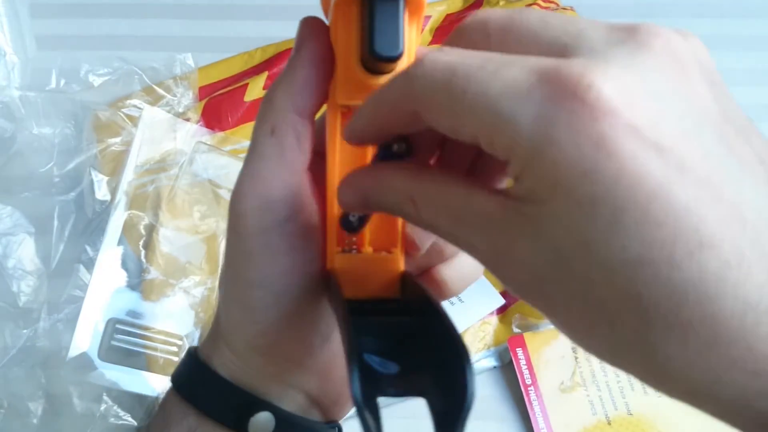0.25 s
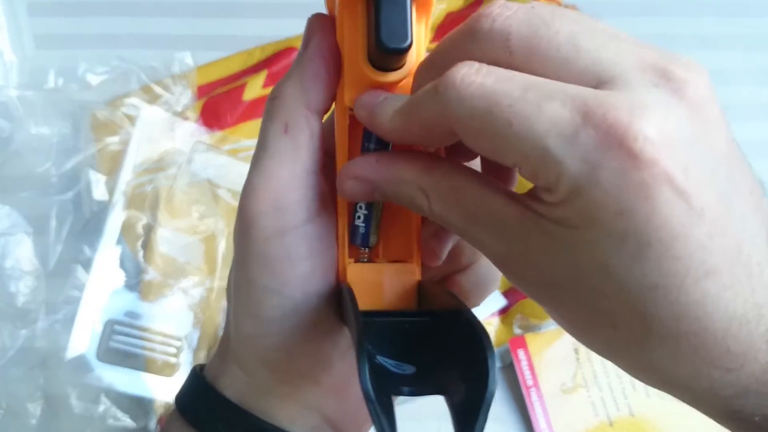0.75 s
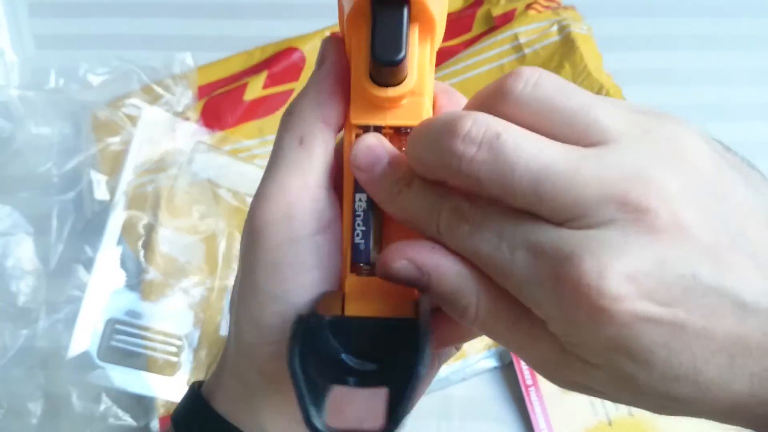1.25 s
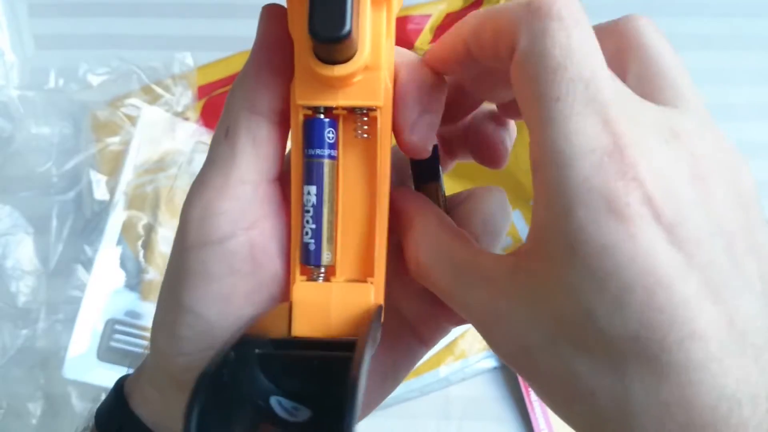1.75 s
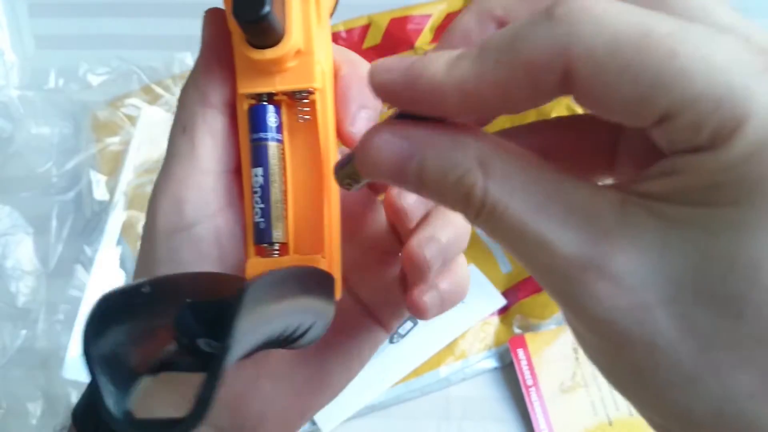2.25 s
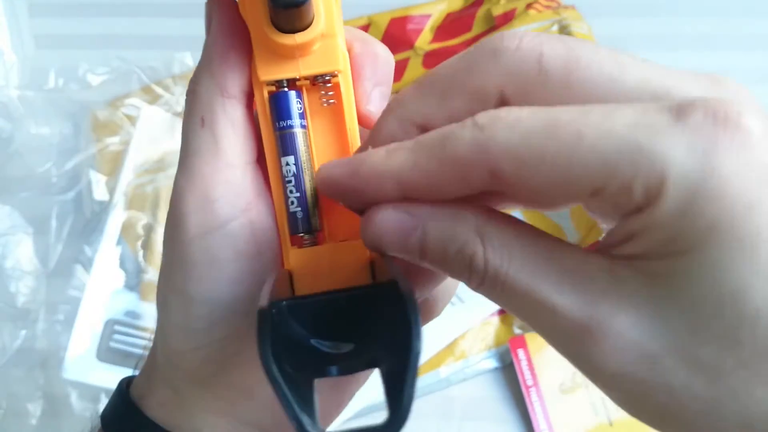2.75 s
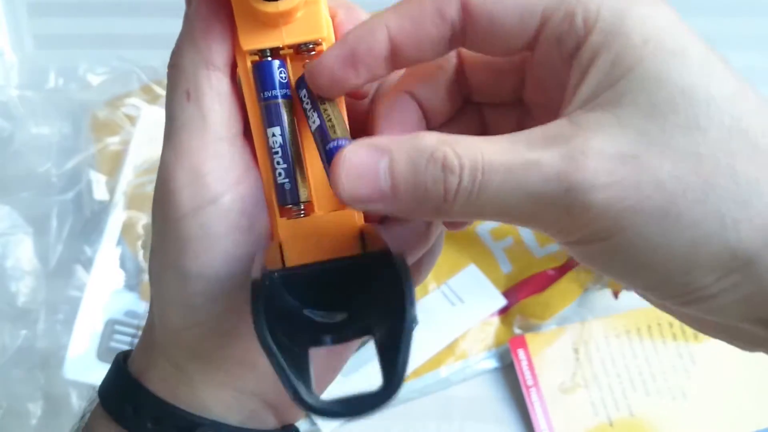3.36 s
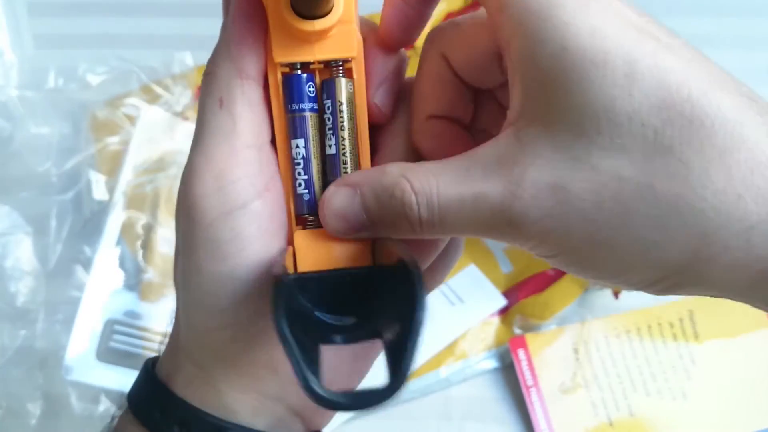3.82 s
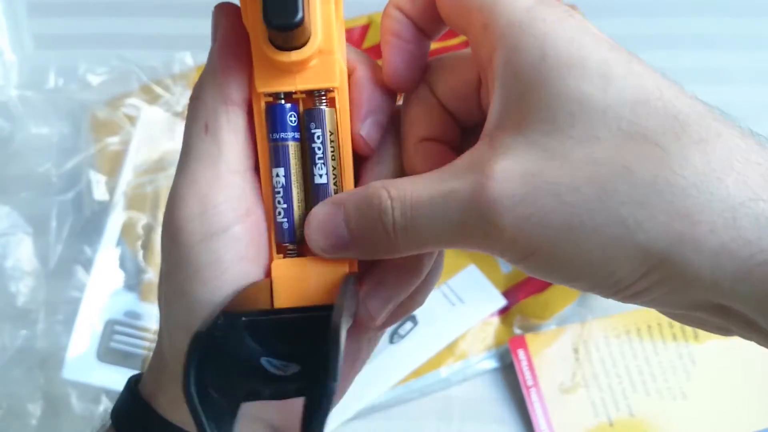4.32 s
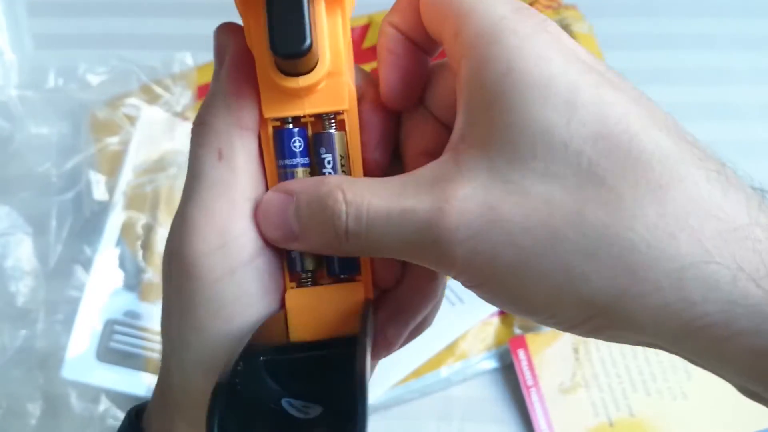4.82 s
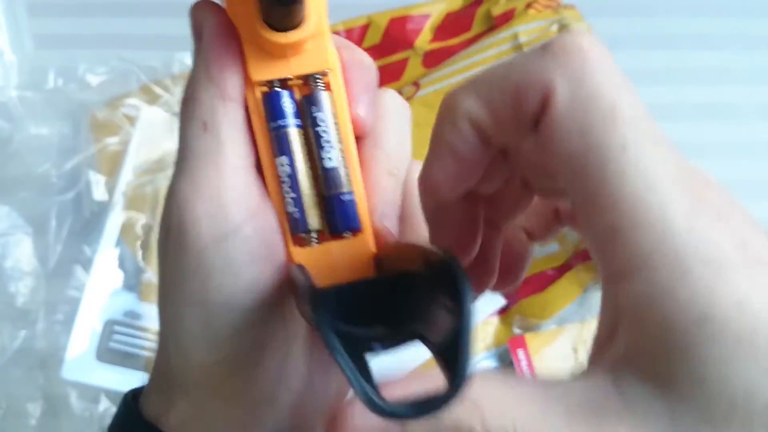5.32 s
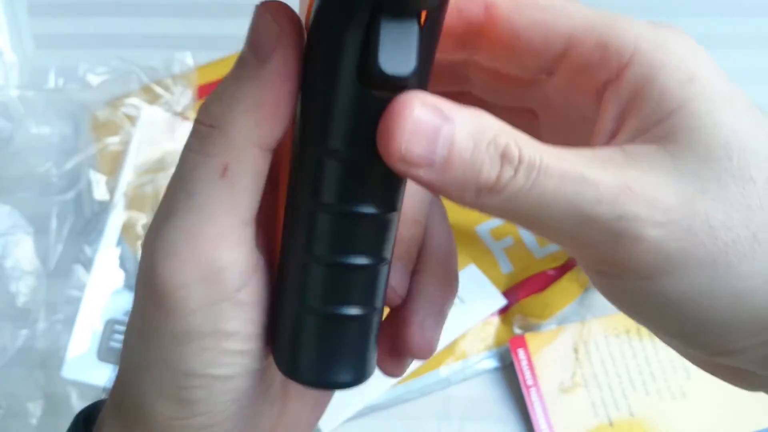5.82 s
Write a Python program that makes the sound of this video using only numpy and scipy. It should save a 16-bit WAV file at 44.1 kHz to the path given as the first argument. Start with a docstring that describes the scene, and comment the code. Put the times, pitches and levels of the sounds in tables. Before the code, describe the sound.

Small batteries click, scrape and snap into a handheld tool's plastic compartment, then the cover locks with a loud crack.

```python
"""A plastic battery cover locks with a hard crack that overloads the microphones, ending the scene.
Before it, two small batteries tick, scrape and snap against their springs in the grip of a handheld tool,
fingers rub the plastic and the cover swings shut. Impacts and stick-slip friction excite the resonant
modes of the case; springs and cover ring on after each blow. A small, live room adds reflections and
reverberation, and a thin top-treble hiss lingers after each blow, over a faint rumble, hum and hiss."""
import sys
import numpy as np
from scipy import signal
from scipy.fft import rfft, irfft, next_fast_len
from scipy.io import wavfile
from scipy.ndimage import map_coordinates

SR = 44100
rng = np.random.default_rng(int(sys.argv[2]) if len(sys.argv) > 2 else 0)


def wav_out(sig):
    """Save sig, one row per channel (or a flat mono array), as 16-bit PCM at SR to the path in sys.argv[1]."""
    wavfile.write(sys.argv[1], SR, np.round(np.clip(np.atleast_2d(sig).T, -1, 1) * 32767).astype(np.int16))


N = 268128
LATCH_S = 5.9997  # the cover locks


# Rebounds of the cover: (time after locking [s], level re the first blow [dB])
COVER_REBOUNDS = [(.0034, -7), (.0062, -17.5), (.0098, -25), (0.0147, -24.5), (0.019, -15.5)]

def latch(db, knock_db, ring_db, edge_db, wall_hz, wall_db, contact_ms, pan_db):
    """Impact and rebound: the cover locks with the hardest blow, then settles in weaker ones."""
    return [(LATCH_S + delay, db + softer_db, knock_db, ring_db, edge_db,
             wall_hz, wall_db, contact_ms, pan_db)
            for delay, softer_db in [(0, 0), *COVER_REBOUNDS]]


def catch():
    """Damped resonance: the small, stiff catch rings briefly in the top treble as it locks."""
    track, t = np.zeros((2, N)), np.arange(SR // 8) / SR
    zing = unit(filtered(stereo_noise(len(t), alike=0.2), lambda f: resonance(f, hz=15010, width=980) ** 2))
    add(track, LATCH_S, zing * decay(t, db=-17.5, t60=0.11))
    return track


# Spectrum of the jolted grip: (frequency [Hz], relative level [dB])
GRIP_SPECTRUM = [(20, -25), (40, -9), (60, 4), (100, -4), (170, -16), (260, -19), (450, -19), (1200, -46)]

def thud():
    """Recoil: the latch jolts the whole grip in the hand, giving a low, damped thud."""
    track, t = np.zeros((2, N)), np.arange(SR // 4) / SR
    body = shaped_noise(len(t), GRIP_SPECTRUM, alike=0.58)
    add(track, LATCH_S, body * decay(t, db=-42, t60=0.155) * amp([[-9], [3]]))
    return track


# A battery seats or the cover shuts: (time [s], relative level [dB], knock [dB], ring [dB], edge [dB],
# wall frequency [Hz], wall strength [dB], contact time [ms])
SEATING_BLOWS = [(3.5793, -14, -15.5, 2.9, -13, 3830, 3.4, 2.4),
                 (3.9349, -21, -14.5, 5.1, -6.5, 2310, 10, 1.1),
                 (5.3968, -18.5, -14, 4, -7.5, 3920, 0.76, 3.4)]
# Slip, strike and rebound: (time from the strike [s], relative level [dB])
SNAP_PHASES = [(-.0026, -17), (0, 0.5), (.0006, -6)]

def snaps(pan_db=0.3):
    """Snap-through: a part slips over its lip, strikes its seat and rebounds."""
    return [(s + delay, db + phase_db, knock_db, ring_db, edge_db, wall_hz, wall_db, contact_ms, pan_db)
            for s, db, knock_db, ring_db, edge_db, wall_hz, wall_db, contact_ms in SEATING_BLOWS
            for delay, phase_db in SNAP_PHASES]


# A battery or the cover taps the case: (time [s], relative level [dB], hardness [dB],
# wall frequency [Hz], wall strength [dB], contact time [ms], left minus right [dB])
LIGHT_BLOWS = [(0.002, -37, -16, 3150, 14, 5, 0.5), (0.1942, -45, 2.5, 3230, 1, 2, -4),
               (0.2285, -35.5, -8.5, 3150, 7, 2.83, -1.5), (0.58, -43.5, -10.5, 4570, 0, 2.03, -1),
               (0.8721, -32.5, -4.5, 3200, 5, 0.6, 2), (0.9177, -36.5, -3.5, 2360, 0, 1.6, 1),
               (0.9325, -27.5, -6.5, 3040, 9.5, 1.74, -7), (1.2326, -36, -2, 2240, 1, 2.96, 4),
               (1.411, -58.5, -2, 3200, 4, 3.7, -0.5), (2.397, -37, -6.5, 3760, 13, 0.56, -1.5),
               (2.4127, -33.5, -2, 3700, 4.5, 3.04, 4), (2.8124, -43, -5.5, 3180, 4, 4.1, 2),
               (2.9778, -53, -7, 3600, 3, 3.9, 1), (3.2116, -30, -4.5, 3260, 17.5, 1.2, 3),
               (3.2162, -29.5, -2, 3260, 18.5, 1.96, 4), (3.4596, -29.5, -9.5, 3280, 2.5, 3.9, 1.5),
               (3.5014, -34.5, -6, 2570, 0, 2.3, -4), (4.4084, -41, -1.5, 4160, 16, 1.35, -0.5),
               (4.6894, -48, 1.5, 3910, 6, 4.24, 0.5), (5.2816, -62, 10, 4310, 6, 1.8, 2),
               (5.2942, -51, 4, 2505, 7, 1.67, -1), (5.3133, -38.5, -0.5, 3510, 2, 7, 0),
               (5.3615, -35, -1, 2700, 10, 4.3, 1), (5.383, -34, -19, 2490, 11, 3.4, 3),
               (5.736, -48, -11, 1790, 15, 2.4, -3.5)]

def taps(knock_db=-12, edge_db=-13, edge_per_hardness=0.93):
    """Contact stiffness: the harder a light blow, the more energy reaches the upper registers."""
    return [(s, db, knock_db, hardness_db, edge_db + edge_per_hardness * hardness_db,
             wall_hz, wall_db, contact_ms, pan_db)
            for s, db, hardness_db, wall_hz, wall_db, contact_ms, pan_db in LIGHT_BLOWS]


# Free modes of the steel springs and the cover: (frequency [Hz], relative level [dB], 60 dB decay time [s])
RINGING_MODES = [(1340, -14.5, 0.021), (5170, -19, 0.055), (6820, -12.5, .07), (6970, -17.5, 0.087),
                 (7100, -25.5, .08), (14900, -24.5, 0.062)]
# Limits of the knock, middle, ring and edge registers: (frequency [Hz])
REGISTER_LIMITS = [780, 1900, 4600, 8000, 17500]

def impact(knock_db, ring_db, edge_db, wall_hz, wall_db, contact_ms, pan_db):
    """Impulse excitation: a blow and its chatter ring the case; register levels are re the middle one."""
    t = np.arange(SR // 12) / SR
    progress = t / (contact_ms / 1000)
    contact = (1 - np.exp(-progress / 0.14)) * np.exp(-progress / 0.83)
    settling = amp(-17) * np.exp(-t / .009)
    chatter = (contact + settling) * stereo_noise(len(t), alike=0.37)
    force = chatter / np.linalg.norm(chatter, axis=1, keepdims=True)
    force[:, np.searchsorted(progress, .15)] += amp(-3)  # the main blow, the same on both sides
    shell = unit(filtered(force, lambda f: case(f, wall_hz, wall_db, wall_width=590)))
    for hz, db, t60 in RINGING_MODES:
        shell += decay(t, db, t60) * np.sin(2 * np.pi * (hz * t + rng.random((2, 1))))
    sound = amp(-43) * unit_band(force, 150, 550, order=2)  # the blow faintly nudges the whole grip
    for lo, hi, db in zip(REGISTER_LIMITS, REGISTER_LIMITS[1:], [knock_db, 0, ring_db, edge_db]):
        sound += amp(db) * unit_band(shell, lo, hi, order=4)
    return sound * amp(-17 + np.array([[pan_db], [-pan_db]]) / 2)


def impacts(blows, wall_share):
    """Superposition: all blows add on one track; wall_share scales the struck wall's strength in dB."""
    track = np.zeros((2, N))
    for s, db, knock_db, ring_db, edge_db, wall_hz, wall_db, contact_ms, pan_db in blows:
        sound = impact(knock_db, ring_db, edge_db, wall_hz, wall_share * wall_db, contact_ms, pan_db)
        add(track, s - .0003, amp(db) * sound)
    return track


# Modes of the loaded case: (frequency [Hz], nominal bandwidth [Hz], relative level [dB])
CASE_MODES = [(1060, 410, -12.5), (1364, 440, -2.5), (1800, 490, -4.5), (2385, 400, 1), (3040, 600, 1.5),
              (3853, 730, -0.5), (4640, 620, -13.5), (5415, 370, 6), (5827, 560, 7), (6530, 460, -3),
              (7780, 3200, -12), (10390, 2100, -15), (12730, 1200, -19.5), (14130, 1100, -14)]

def case(f, wall_hz, wall_db, wall_width):
    """Modal response: the modes of the case and the note of the touched wall add in power."""
    modes = [*CASE_MODES, (wall_hz, wall_width, wall_db)]
    power = sum(amp(db) ** 2 * abs(resonance(f, hz, width)) ** 3 for hz, width, db in modes)
    cepstrum = irfft(np.log(power + 1e-8) / 2)
    cepstrum[1:] *= 2  # minimum phase: the ringing follows its cause
    return np.exp(rfft(cepstrum[:len(f) - 1], len(cepstrum)))


# A battery or finger slides on plastic: (peak time [s], half duration [s], level [dB], frequency [Hz])
SLIDE_STROKES = [(0.039, 0.052, -56.5, 3120), (0.191, 0.071, -56, 3340), (2.07, .08, -68.5, 4100),
                 (2.901, 0.091, -67.5, 4050), (4.72, 0.082, -62, 4080)]
# A pressed part creeps and squeaks: (peak time [s], half duration [s], level [dB], frequency [Hz])
SQUEAK_STROKES = [(2.297, 0.15, -75, 5300), (2.536, 0.038, -67, 6150), (2.8, .03, -53.5, 5470),
                  (4.245, 0.028, -58, 5480), (4.35, .025, -61, 5400), (4.619, 0.027, -62.5, 5480),
                  (5.199, 0.024, -66.5, 5310), (5.304, 0.021, -54.5, 5800), (5.66, 0.076, -59.5, 5270)]

def friction(slips_per_s=2500, jerks_per_s=45, jerk_db=2.5):
    """Stick-slip friction: tiny slips excite the case; on a spring they squeak in a narrow band."""
    track = np.zeros((2, N))
    jerks = map_coordinates(rng.standard_normal(N // 100), [np.arange(N) * jerks_per_s / SR])
    for strokes, note_db, width_hz in [(SLIDE_STROKES, 13, 970), (SQUEAK_STROKES, 16.5, 180)]:
        for s, half_s, db, hz in strokes:
            t = np.arange(max(s - 2 * half_s, 0), s + 2 * half_s, 1 / SR)
            roughness = stereo_noise(len(t), alike=0.16)
            slips = (rng.random(len(t)) < slips_per_s / SR) * rng.uniform(.5, 1.6, len(t))
            scrape = unit(filtered(roughness * (0.38 + slips), lambda f: case(f, hz, note_db, width_hz)))
            swell = np.exp(-((t - s) / half_s) ** 2)
            add(track, t[0], amp(db) * scrape * swell)
    return track * unit(amp(jerk_db * jerks))


# Early reflections from nearby walls: (delay [s], gain [dB])
REFLECTIONS = [(.0062, -27.5), (.0096, -21.5), (0.0132, -19), (0.0137, -23.5), (0.025, -25)]
# Decay of the tail: room reverberation, plus a thin top-treble hiss lingering after each blow:
# (frequency [Hz], 60 dB decay time [s])
TAIL_DECAY = [(200, 0.28), (1200, 0.55), (3000, 0.67), (6000, 0.48), (10000, .48), (14000, 0.99)]
# Colour of the diffuse tail: (frequency [Hz], gain [dB])
TAIL_COLOUR = [(100, -14), (700, 8.5), (1500, -4), (3000, -2.5), (5500, 0), (9000, -4.5), (15000, -7.5)]

def room(x, tail_db, build_s):
    """Reflection and diffusion: nearby walls answer, then the room reverberates; a thin hiss lingers."""
    hz, t, spectra = signal.stft(rng.standard_normal((2, 2, SR * 2 // 3)), SR, nperseg=256)
    fade = decay(t, db=0, t60=log_interp(TAIL_DECAY, hz)[:, None])
    build = 1 - np.exp(-t / build_s)
    tail = signal.istft(spectra * fade * build, SR, nperseg=256)[1]
    tail /= np.linalg.norm(tail[0])
    response = amp(tail_db) * filtered(tail, lambda f: amp(log_interp(TAIL_COLOUR, f)))
    for delay, db in REFLECTIONS:
        arrival = np.round((delay + rng.normal(0, .00015, 2)) * SR).astype(int)
        response[[0, 1], [0, 1], arrival] += amp(db)  # left to left, right to right
    return signal.fftconvolve(x[None], response, axes=2).sum(axis=1)[:, :N]


# Room rumble and microphone hiss: (frequency [Hz], relative spectral density [dB])
RUMBLE_SPECTRUM = [(20, -12.5), (45, -2), (75, 0.5), (105, -5.5), (135, -3), (200, -12), (300, -16),
                   (380, -16), (600, -24.5), (2000, -64)]
HISS_SPECTRUM = [(100, -10.5), (600, -4), (1500, -0.5), (3000, 2), (4600, -2.5), (5600, 2.5), (7000, -8.5),
                 (10000, -26), (13500, -8.5), (16000, -6)]
# Steady hum in the room: (frequency [Hz], level [dB])
HUM_TONES = [(86, -89), (129, -87.5)]

def noise_floor():
    """Stationary noise: broadband rumble and hiss lie under everything, with a faint tonal hum."""
    rumble = shaped_noise(N, RUMBLE_SPECTRUM, alike=0.15)
    hiss = shaped_noise(N, HISS_SPECTRUM, alike=0)
    hum = sum(amp(db) * unit(np.sin(2 * np.pi * hz * np.arange(N) / SR)) for hz, db in HUM_TONES)
    return amp(-76.5) * rumble + amp(-70.5) * hiss + hum


def amp(db):
    """Amplitude ratio of a level in decibels."""
    return 10 ** (np.asarray(db) / 20)


def unit(x):
    """Normalisation to unit RMS."""
    return x / np.sqrt(np.mean(x ** 2) + 1e-20)


def decay(t, db, t60):
    """Exponential damping: the level starts at db and falls 60 dB in t60 seconds."""
    return amp(db - 60 * t / t60)


def resonance(f, hz, width):
    """Velocity response of a damped oscillator, unity at its peak."""
    return 1j * f * width / (hz * hz - f * f + 1j * f * width)


def log_interp(points, hz):
    """Interpolation of (frequency [Hz], value) points on a logarithmic frequency axis."""
    frequencies, values = np.transpose(points)
    return np.interp(np.log(hz + 1), np.log(frequencies), values)


def filtered(x, response):
    """Linear filtering: the spectrum of x is multiplied by a frequency response."""
    n = x.shape[-1]
    padded = next_fast_len(n + SR // 8)
    return irfft(rfft(x, padded) * response(np.fft.rfftfreq(padded, 1 / SR)), padded)[..., :n]


def unit_band(x, lo, hi, order):
    """Band-pass filtering from lo to hi [Hz], at unit RMS."""
    return unit(signal.sosfilt(signal.butter(order, [lo, hi], "band", fs=SR, output="sos"), x))


def stereo_noise(n, alike):
    """Partial coherence: two white noises share the fraction alike of their power."""
    return np.sqrt(alike) * rng.standard_normal(n) + np.sqrt(1 - alike) * rng.standard_normal((2, n))


def shaped_noise(n, spectrum, alike):
    """Spectral shaping of stereo noise, at unit RMS."""
    return unit(filtered(stereo_noise(n, alike), lambda f: amp(log_interp(spectrum, f))))


def add(track, s, sound):
    """Superposition of a sound on a track at time s."""
    start = max(round(s * SR), 0)
    part = track[:, start:start + sound.shape[-1]]
    part += sound[:, :part.shape[-1]]


def scene():
    """Direct and diffuse fields: the handling is heard both ways, over the noise floor."""
    blows = taps() + snaps() + latch(db=-14.5, knock_db=-10.5, ring_db=12.5, edge_db=11,
                                     wall_hz=5497, wall_db=10, contact_ms=4.75, pan_db=-2)
    rubs_and_catch = friction() + catch()
    # the struck wall faces the microphones, and its sound reaches the left one first
    facing = impacts(blows, wall_share=1) + rubs_and_catch
    lag_s = np.array([[0], [.000155]])
    direct = filtered(facing, lambda f: np.exp(-2j * np.pi * f * lag_s))
    # all sides of the case radiate into the room, so that single wall stands out less
    all_sides = impacts(blows, wall_share=.3) + rubs_and_catch
    echoes = room(all_sides, tail_db=-7, build_s=0.0023)
    return (direct + echoes) * amp([[-.8], [.8]]) + thud() + noise_floor()


def record(dry):
    """Overload and band limiting: the hardest crack clips at full scale, then meets a steep low-pass."""
    cutoff_hz = 16350
    clipped = np.clip(dry, -1, 1)
    return filtered(clipped, lambda f: 1 / np.sqrt(1 + (f / cutoff_hz) ** 240))


dry = scene()
out = record(dry)
wav_out(out)
```